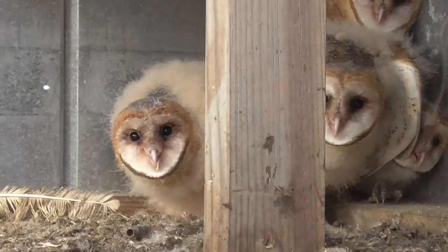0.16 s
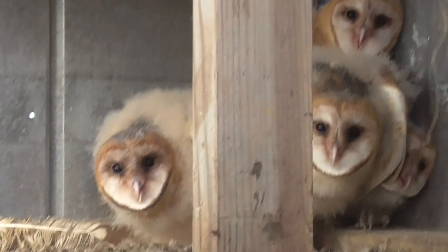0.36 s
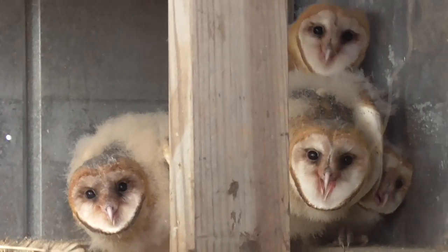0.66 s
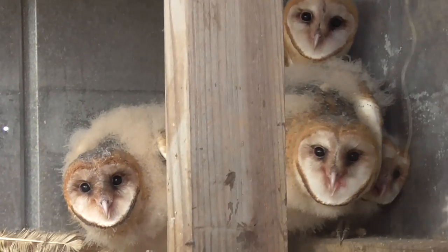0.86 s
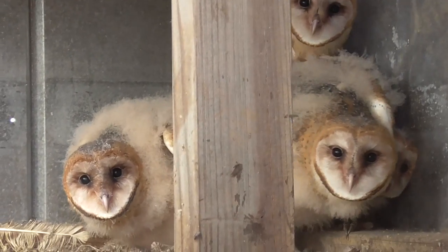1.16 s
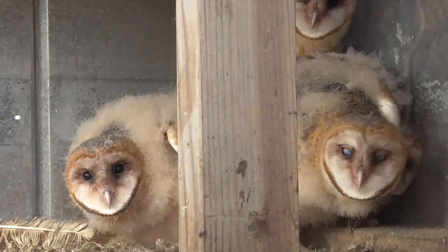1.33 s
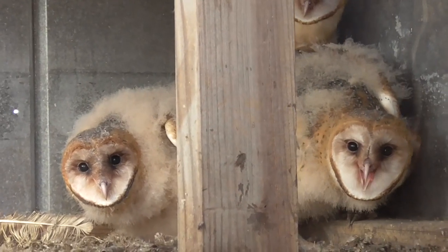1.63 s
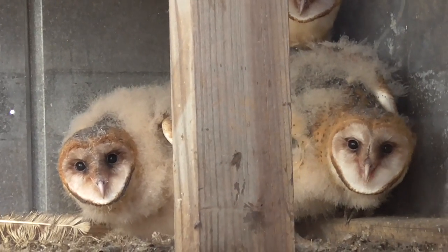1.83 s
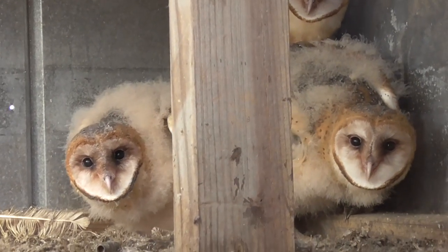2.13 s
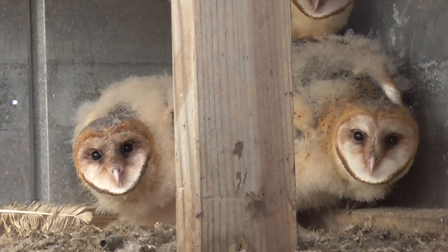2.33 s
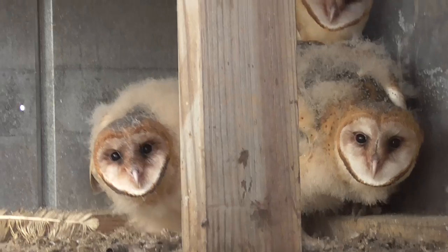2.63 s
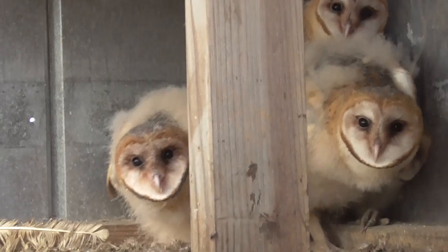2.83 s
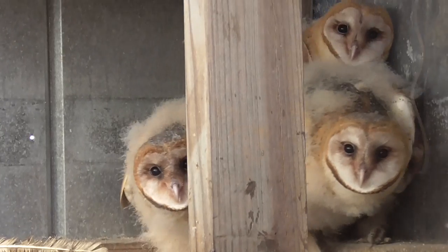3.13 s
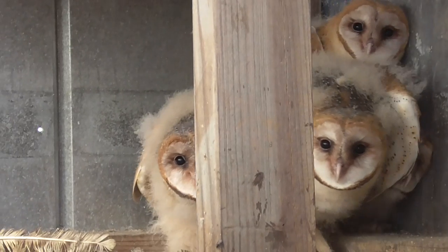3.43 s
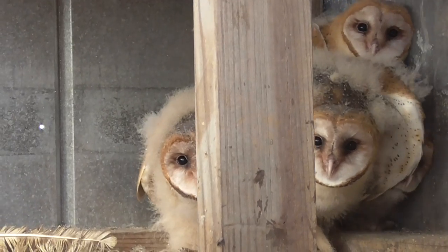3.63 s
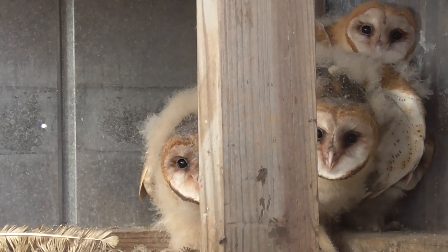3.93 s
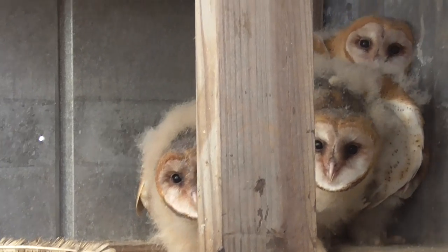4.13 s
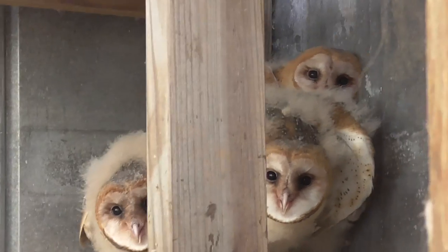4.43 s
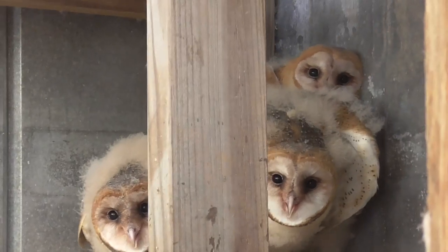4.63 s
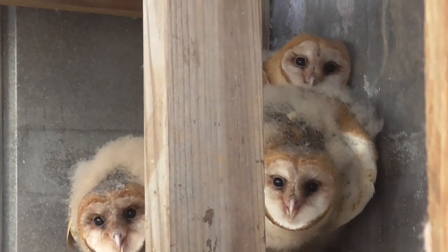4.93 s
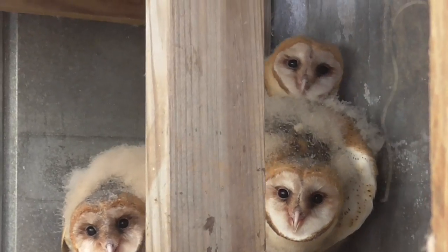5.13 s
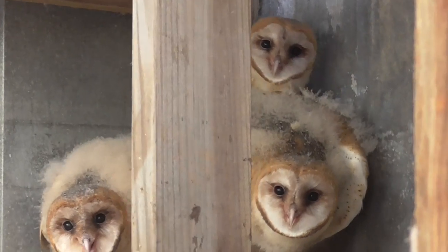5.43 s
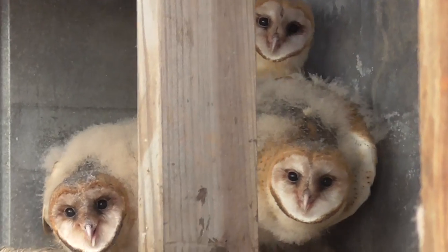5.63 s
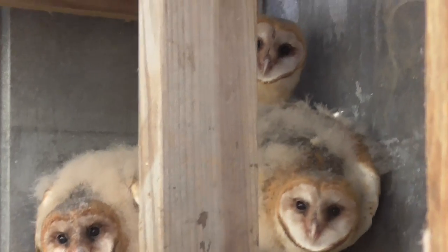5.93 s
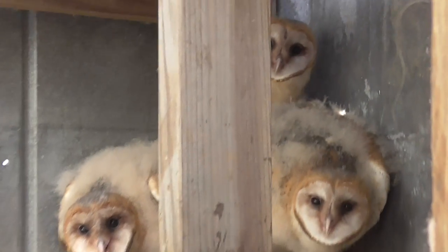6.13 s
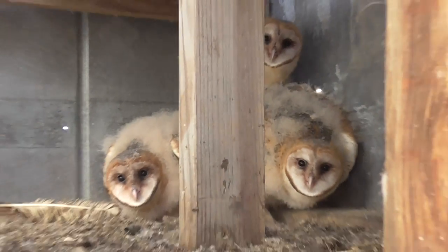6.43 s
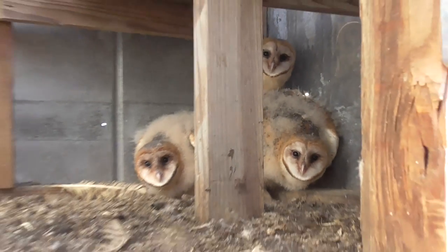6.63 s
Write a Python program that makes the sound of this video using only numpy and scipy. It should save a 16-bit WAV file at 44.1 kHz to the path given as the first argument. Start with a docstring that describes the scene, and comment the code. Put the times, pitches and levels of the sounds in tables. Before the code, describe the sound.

Inside a small boxy wooden shelter, several owlets give long airy hisses, one after another and overlapping. An early hiss fades near one second over a steady one, then another rises with a thin, high whistling edge, and further hisses build fiercely. A single dry board knock sounds early. Bassy handling bumps and rubbing come through the stereo camera microphones, over very faint open air.

```python
"""Hissing already under way, with rubs and thumps of a hand on a camera: young barn owls in a wooden blind.
Overlapping hisses: noise shaped by moving throat and beak resonances; the rising one has a narrow band
near 8.5 kHz that fades early. Close walls add echoes and standing waves.
One knock on wood: short decaying modes plus a crack. Handling: low noise in bursts plus swelling low tones,
mostly opposed between two microphones. A faint, dull wash of open air lies underneath."""
import sys
import numpy as np
from scipy import signal
from scipy.fft import rfft, irfft, next_fast_len
from scipy.io import wavfile
from scipy.ndimage import uniform_filter1d

SR = 44100
rng = np.random.default_rng(int(sys.argv[2]) if len(sys.argv) > 2 else 0)


def waveform_to_disk(signal):
    """Save audio, clipped to [-1, 1], as 16-bit WAV at the path in sys.argv[1]."""
    frames = np.transpose(np.atleast_2d(signal))
    scaled = np.clip(frames, -1, 1) * 32767
    samples = np.round(scaled).astype(np.int16)
    wavfile.write(sys.argv[1], SR, samples)


N = 298557
TIME_S = np.arange(N) / SR
PADDED = next_fast_len(N + 4096)
PADDED_HZ = np.fft.rfftfreq(PADDED, 1 / SR)


def amp(db):
    """Amplitude factor from dB."""
    return 10 ** (np.asarray(db) / 20)


def unit(x):
    """Scales to an rms of 1."""
    return x / np.sqrt(np.mean(x ** 2) + 1e-20)


def colour(x, gain):
    """Filters by one gain per frequency bin."""
    return irfft(rfft(x, PADDED) * gain, PADDED)[..., :N]


def read(rows):
    """Interpolates a spectrum table's columns over log frequency."""
    hz, *columns = np.transpose(rows)
    log_hz = np.log(PADDED_HZ + 1)
    return [np.interp(log_hz, np.log(hz), column) for column in columns]


def noise(spectrum, channels):
    """Independent noises of one spectrum, joint rms 1."""
    white = rng.standard_normal((channels, N))
    return unit(colour(white, amp(read(spectrum)[0])))


def wander(hz):
    """Slow random curve of rms 1, varying up to about hz."""
    return unit(colour(rng.standard_normal(N), np.exp(-(PADDED_HZ / hz) ** 2)))


def ramp(t, length_s):
    """Quarter sine from 0 at t = 0 to 1 at length_s, then level."""
    return np.sin(np.pi / 2 * np.clip(t / length_s, 0, 1))


def envelope(t, length_s, attack_s, release_s, growth_db_per_s):
    """Attack, a hold that grows or sags, release."""
    hold = amp(growth_db_per_s * np.clip(t - attack_s, 0, length_s))
    return ramp(t, attack_s) * hold * ramp(length_s - t, release_s)


# open air spectrum: hz, relative_db (per Hz)
OUTDOORS = [(20, -10), (80, -12.5), (200, 4), (350, 2.5), (900, -12), (3000, -33), (15000, -35)]


def outdoors(level_db):
    """Open air through the walls: dull noise, partly common to both channels."""
    common, left, right = noise(OUTDOORS, channels=3)
    return amp(level_db) * (common + 0.49 * np.array([left, right]))


RUB_ATTACK_S, RUB_RELEASE_S, RUB_EASE_DB_PER_S = 0.037, 0.06, -22
SETTLE_DB, SETTLE_S = -17, .11  # tremble: level relative to the rub, decay time constant


def rub(start_s, length_s, relative_db):
    """Strength of one grip shift: catches, eases off, lets go and leaves a tremble."""
    t = TIME_S - start_s
    tremble = amp(SETTLE_DB) * ramp(t, length_s) * np.exp(-np.maximum(t - length_s, 0) / SETTLE_S)
    shift = envelope(t, length_s, RUB_ATTACK_S, RUB_RELEASE_S, RUB_EASE_DB_PER_S)
    return amp(relative_db) * (shift + tremble)


# grip shifts: start_s, length_s, relative_db
RUBS = [(.01, 0.089, -25), (0.18, 0.18, -27), (0.402, 0.32, -31.5), (.71, 0.093, -26), (0.98, 0.46, -39),
        (2.417, 0.27, -46.5), (2.907, 0.095, -43), (3.1, 0.14, -33.5), (3.298, 0.15, -34),
        (3.504, 0.24, -47), (4.038, 0.35, -28.5), (4.529, 0.28, -30), (4.854, .21, -35), (5.153, 0.18, -25),
        (5.425, 0.17, -37), (5.7, 0.4, -27.5), (6.17, .11, -47), (6.443, 0.1, -26.5), (6.56, 0.28, -48)]
# rumble spectrum: hz, relative_db (per Hz)
RUMBLE = [(20, -19), (45, -6), (80, 2.5), (120, 0), (180, -5), (250, -12), (400, -25), (900, -65)]
# hand bumps: crest_s, relative_db, pitch_hz, length_s
BUMPS = [(.287, -21, 150, 0.0099), (0.518, -25, 120, 0.0075), (.552, -16, 151, 0.0021),
         (0.576, -10, 143, 0.0021), (0.646, -14.5, 147, 0.003), (0.738, -13, 102, 0.0046),
         (3.137, -38, 110, 0.0082), (3.328, -32, 118, .014), (4.128, -28.5, 126, 0.013),
         (5.192, -20, 105, 0.0065), (5.231, -8, 159, 0.0065), (5.748, -20, 114, 0.0096),
         (5.777, -10.5, 161, 0.0026), (6.485, -13, 135, 0.0046)]
SLIP_DB, SLIP_HZ = 2.5, 22  # stick-slip unevenness: rms depth, speed


def handling(rumble_db, bumps_db, common_db):
    """Rubs and bumps on the camera body shake the microphones mostly against each other."""
    grip = amp(rumble_db + SLIP_DB * wander(SLIP_HZ)) * sum(rub(*row) for row in RUBS)
    side, mid = grip * noise(RUMBLE, channels=2)
    bumps = np.zeros(N, complex)  # real part to side, imaginary part to mid
    for crest_s, relative_db, pitch_hz, length_s in BUMPS:
        t = TIME_S - crest_s
        swell = np.exp(2 * (1 - np.hypot(t / length_s, 1)))
        tone = np.exp(2j * np.pi * (pitch_hz * t + rng.random()))
        bumps += amp(relative_db + bumps_db) * swell * tone
    mid = amp(common_db) * (mid + bumps.imag)
    side = side + bumps.real
    return np.array([mid + side, mid - side])


# microphone pair: hz, side_echoes_db, left_minus_right_db, left_phase_lead_rad
MICS = [(149, -21, -2, 0.22), (700, -13, -2.5, 0.033), (1300, -5.5, 0.5, 0.27), (1800, -2.5, 3, 0.95),
        (2090, -16, 2.5, -0.37), (2450, -27, -1, 0.053), (3000, -25, 0, 0.13), (3880, -15.5, -0.1, 0.63),
        (4700, -8, 0.5, -0.087), (6200, -8, -3, -0.048), (7440, -4, 1.5, 0.34), (8300, -9.5, 0, 0.16),
        (9200, -3.5, -1.5, 0.64), (10600, -10.5, -0.5, -0.16), (12700, -9, -3.5, -.2), (15000, -6, -2, .25)]
BLIND_T60_S = .13


def blind(x, wet):
    """Close walls return a dense, short echo burst; side echoes widen it."""
    t = np.arange(SR // 4) / SR
    echoes_per_s, first_echo_s = 3000, .0015
    heard = (rng.random((2, len(t))) < echoes_per_s / SR) & (t > first_echo_s)
    echoes = rng.standard_normal((2, len(t))) * heard * amp(-60 * t / BLIND_T60_S)
    echoes /= np.linalg.norm(echoes, axis=1, keepdims=True)
    front, sides = signal.fftconvolve(x[None], echoes, axes=1)[:, :N]
    side_echoes_db, _, _ = read(MICS)
    mid = (x + wet * front) / np.hypot(1, wet)
    side = colour(sides, amp(side_echoes_db))
    return np.array([mid + side, mid - side])


# knocked board, before the band-pass: pitch_hz, relative_db, t60_s
BOARD = [(576, -11, 0.069), (784, -0.5, 0.048), (1147, 6, 0.02), (1520, -14, 0.026), (4000, -1, 0.013)]


def knock(start_s, level_db, crack_db):
    """A sharp tap rings a thin board, which radiates little bass."""
    t = np.maximum(TIME_S - start_s, 0)
    ring = sum(amp(db - 60 * t / t60_s) * np.sin(2 * np.pi * hz * t) for hz, db, t60_s in BOARD)
    crack = amp(crack_db) * rng.standard_normal(N) * np.exp(-t / 0.00096) * (t > 0)
    band = signal.butter(2, [480, 4600], "band", fs=SR)
    tap = signal.lfilter(*band, ring + crack)
    return blind(-amp(level_db) * tap, wet=0.71)


# wall resonances and hollows: centre_hz, width_hz, gain_db
WALLS = [(480, 17, 1.5), (804, 19, 8.5), (820, 110, -1), (1022, 21, 5.5), (1436, 17, 4.5), (1563, 37, 2.5),
         (2860, 160, -2)]


def standing_waves(x):
    """The small wooden box favours some pitches and hollows out others."""
    gain_db = sum(db * np.exp(-2 * ((PADDED_HZ - centre_hz) / width_hz) ** 2)
                  for centre_hz, width_hz, db in WALLS)
    return colour(x, amp(gain_db))


SLACK = 0.016  # share by which resonances start low, gone at full pressure


def hiss(start_s, length_s, attack_s, release_s, level_db, growth_db_per_s,
         tension, tightening_per_s, wet, throat, flutter_db=0.71):
    """Turbulent air rings throat and beak; tension moves the resonances, the jet flutters."""
    frame, hop = 1024, 256
    hz = np.fft.rfftfreq(frame, 1 / SR)
    t = np.arange(N // hop + 5)[:, None] * hop / SR - start_s
    tension = tension + tightening_per_s * (t - length_s / 2) - SLACK * (1 - ramp(t, attack_s))
    power = sum(amp(db) ** 2 / (1 + 1.58 * ((hz - centre_hz * tension) / width_hz) ** 2) ** 2.48
                for centre_hz, width_hz, db in throat)
    power = power * hz ** 4 / (hz ** 4 + 240 ** 4)  # a small beak radiates little bass
    a, b, eddies = rng.standard_normal((3, len(t), len(hz)))
    eddies = uniform_filter1d(eddies, size=14, axis=0)
    eddies = unit(uniform_filter1d(eddies, size=40, axis=1))
    spectra = (a + 1j * b) * np.sqrt(power) * amp(flutter_db * eddies)
    air = signal.istft(spectra.T, nperseg=frame, noverlap=frame - hop)[1][:N]
    swell = envelope(TIME_S - start_s, length_s, attack_s, release_s, growth_db_per_s)
    return blind(unit(air) * amp(level_db) * swell, wet)


# throat and beak resonances before tension: centre_hz, width_hz, relative_db
OPENING_THROAT = [(620, 210, -24), (1255, 460, -6), (2160, 360, -11), (4100, 1300, -18), (5370, 830, -17.5),
                  (6820, 650, -8), (7350, 240, -1.5), (8740, 350, -2.5), (9440, 650, -1), (10200, 800, -5),
                  (11350, 700, -4.5), (12050, 450, -5.5), (14400, 1100, -15)]
STEADY_THROAT = [(601, 180, 1), (1190, 222, -3), (1650, 580, -16.5), (2270, 244, -4), (4200, 1200, -15.5),
                 (5520, 830, -17), (7350, 500, -14), (9300, 320, -1), (9820, 360, -1), (11140, 870, -6),
                 (11990, 590, -2), (13600, 720, -15)]
RISING_THROAT = [(620, 540, -13), (1210, 330, -7), (1880, 410, -15), (4100, 1100, -18), (5250, 390, -12.5),
                 (6900, 780, -9.5), (7480, 320, -2), (9800, 490, 0.5), (10540, 900, -3.5),
                 (11800, 1400, -17), (14300, 1000, -16.5)]
RISING_FADING_BAND = [(8160, 230, 0)]
WHISTLE_THROAT = RISING_FADING_BAND  # table key only: one resonance of the rising hiss
LONG_THROAT = [(697, 400, -6.5), (1354, 373, -2), (2010, 230, -13.5), (4300, 1900, -17), (5344, 370, -10),
               (6810, 520, -4.5), (7410, 690, -4), (8070, 720, -1.5), (9270, 360, -1), (10600, 580, -4.5),
               (11470, 330, -3), (13200, 600, -13), (15500, 900, -19)]
LAST_THROAT = [(410, 250, -7.5), (1150, 580, -17.5), (2190, 290, -19.5), (3790, 510, -17),
               (5630, 1650, -17.5), (6270, 790, -13.5), (7600, 680, -8.5), (8270, 860, -2),
               (8670, 410, -1.5), (9920, 510, -6.5), (10700, 880, -7.5), (12240, 1000, -14),
               (14600, 900, -19)]
FIERCE_THROAT = [(610, 150, -17.5), (1475, 580, -5), (2010, 370, -8.5), (3810, 1200, -12.5),
                 (4630, 730, -23.5), (6900, 610, -7.5), (7900, 810, -4.5), (8970, 710, 1), (9660, 970, -4),
                 (11300, 740, -5.5), (12000, 450, -5.5), (14700, 1100, -16)]
# hisses, and the fading band of the rising one as a row of its own:
# start_s, length_s, attack_s, release_s, relative_db, growth_db_per_s,
# tension (factor on resonances), tightening_per_s, wet (echo share), throat
HISSES = [(-.1, 1.067, 0.092, 0.28, -24.5, -1.8, .995, 0.014, 0.75, OPENING_THROAT),
          (-.5, 6.8, 1.47, 0.17, -31.5, -0.61, 1.003, -0.000071, 0.55, STEADY_THROAT),
          (1.982, 1.494, 0.93, 0.17, -27, -0.5, 0.996, 0.026, 0.58, RISING_THROAT),
          (2.098, 1.16, 0.13, 0.28, -36.5, -3.5, 1.04, -.005, .28, WHISTLE_THROAT),
          (3, 2.86, 0.62, 0.75, -28.5, -1.07, 0.986, 0.024, 0.7, LONG_THROAT),
          (3.15, 3.95, 2, .1, -30.5, 0, 0.989, 0.0031, .65, LAST_THROAT),
          (4.246, 2.16, 1.63, 0.057, -26.5, -1, 1.004, -0.0071, 0.75, FIERCE_THROAT)]


def owls():
    """Overlapping hisses; the rising one has a narrow band near 8.5 kHz that fades early."""
    return standing_waves(sum(hiss(*row) for row in HISSES))


def scene():
    """Open air, handling, one knock and the owls."""
    background = outdoors(level_db=-51.5)
    camera = handling(rumble_db=-4.0, bumps_db=2, common_db=-8.5)
    wood = knock(.8905, level_db=-21.0, crack_db=10.5)
    return background + camera + wood + amp(-0.5) * owls()


EDGE_HZ = 15850


def record(dry):
    """Microphones differ in level and phase; a low-pass limits the band."""
    _, left_minus_right_db, left_lead_rad = read(MICS)
    left = amp(left_minus_right_db / 2) * np.exp(.5j * left_lead_rad)
    pair = colour(dry, np.array([left, 1 / left]))
    edge = signal.firwin(511, EDGE_HZ, window=("kaiser", 9), fs=SR)
    return signal.oaconvolve(pair, edge[None], "same", axes=1)


dry = scene()
out = record(dry)
waveform_to_disk(out)
```